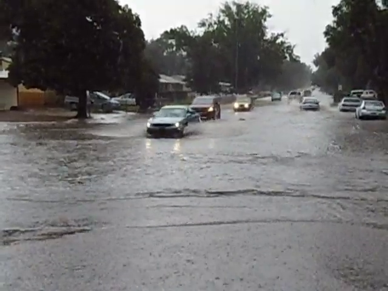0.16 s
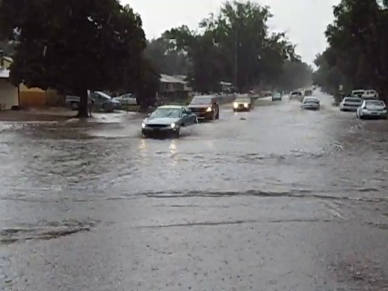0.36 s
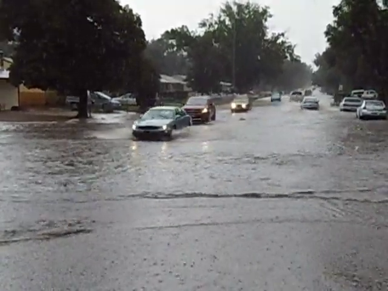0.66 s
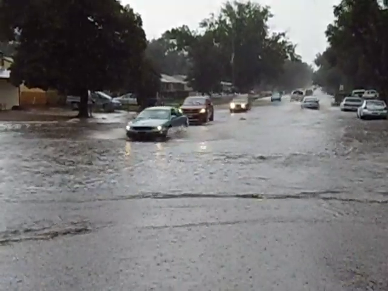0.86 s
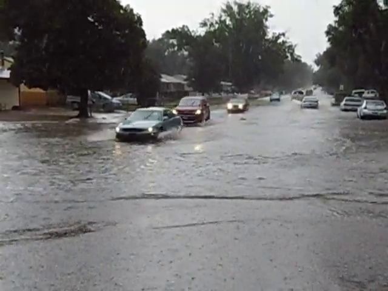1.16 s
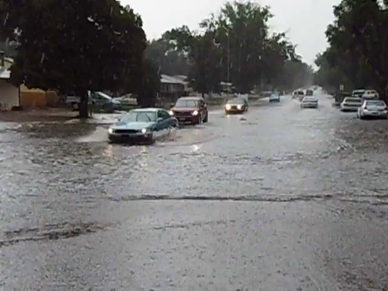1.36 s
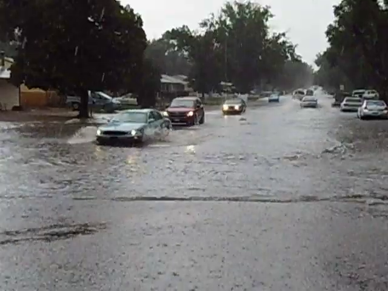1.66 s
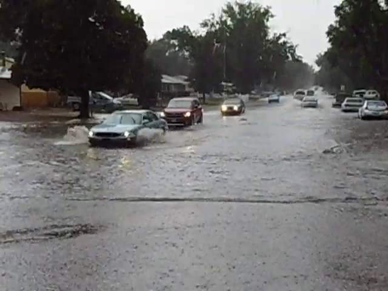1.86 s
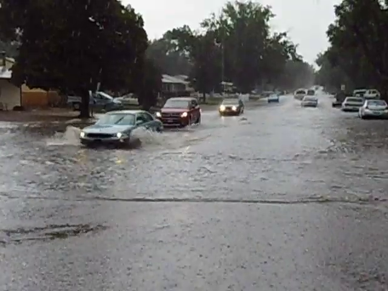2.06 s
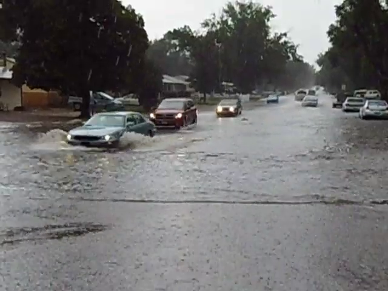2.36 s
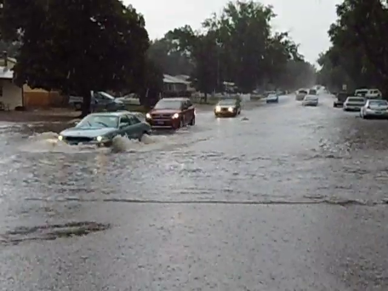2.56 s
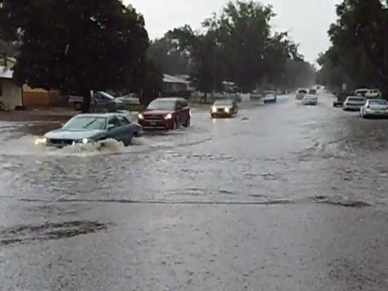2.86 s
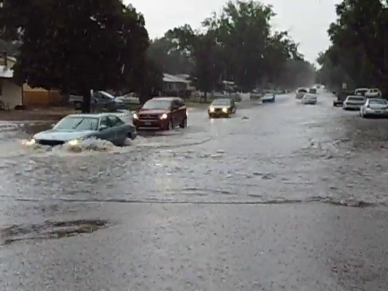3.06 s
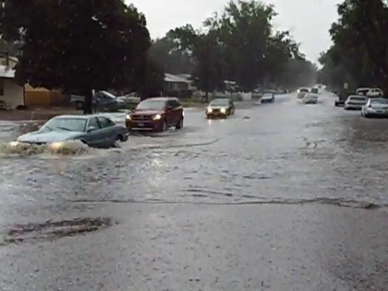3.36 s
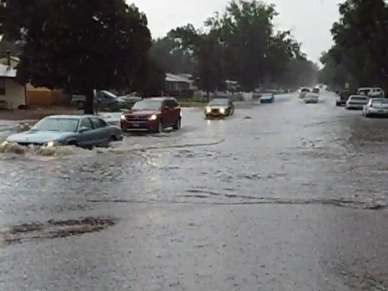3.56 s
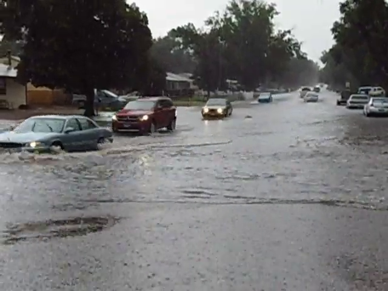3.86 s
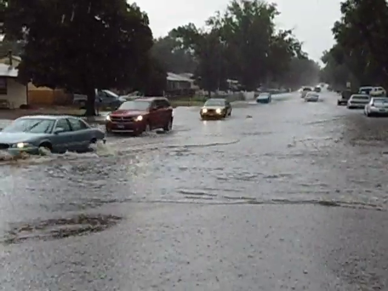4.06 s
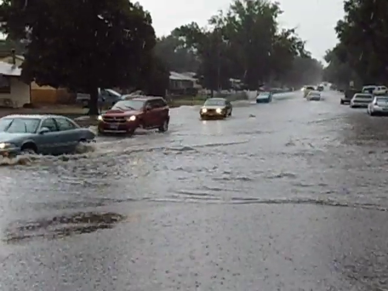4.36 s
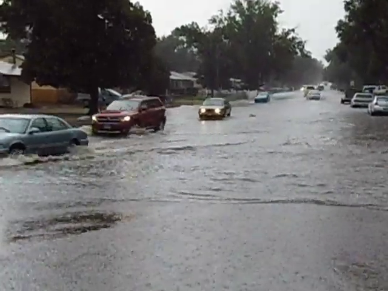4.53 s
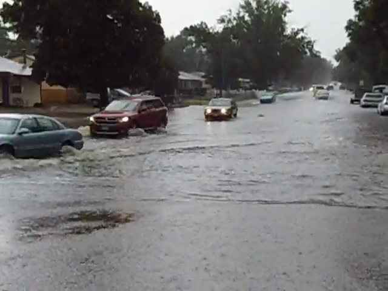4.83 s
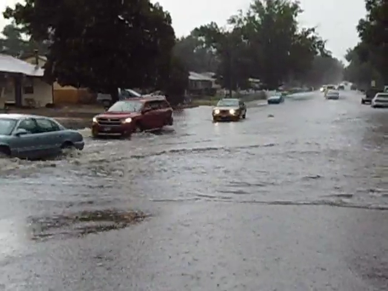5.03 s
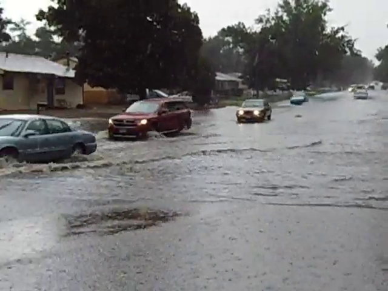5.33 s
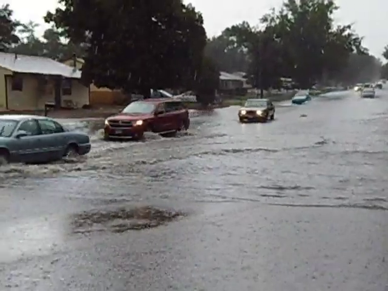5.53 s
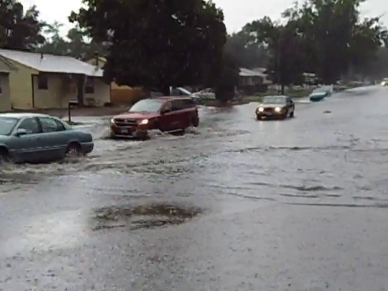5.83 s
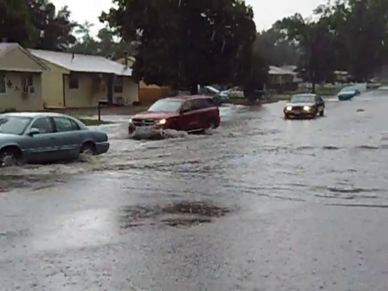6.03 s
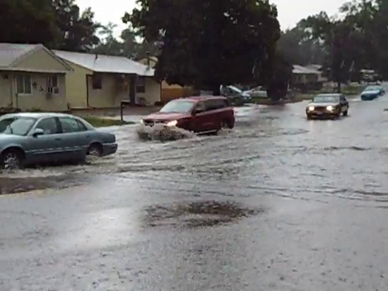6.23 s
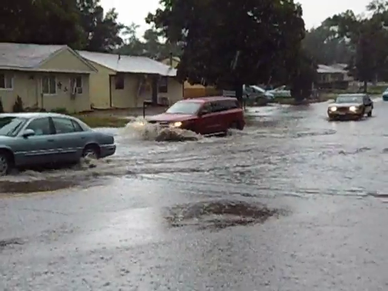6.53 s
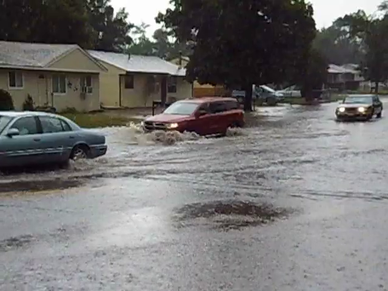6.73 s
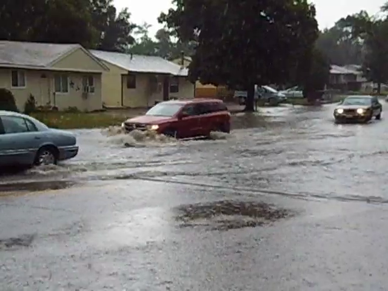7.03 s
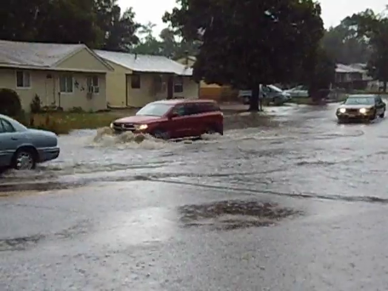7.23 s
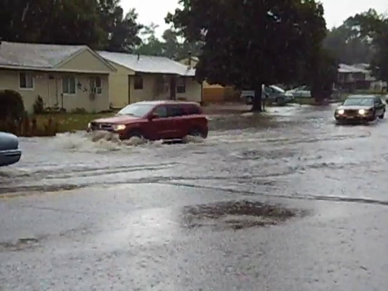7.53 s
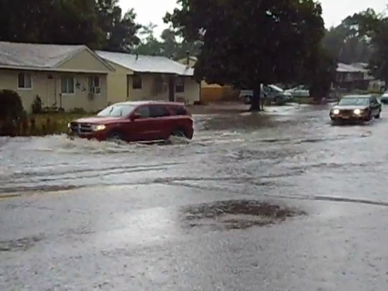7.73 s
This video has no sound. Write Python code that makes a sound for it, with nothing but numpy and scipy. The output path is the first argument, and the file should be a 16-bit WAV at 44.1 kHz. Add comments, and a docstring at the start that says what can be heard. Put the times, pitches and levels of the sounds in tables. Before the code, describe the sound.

Outdoors in a downpour, dense dull rain hiss continues throughout with patter and watery plips. Thunder mutters and gives brief tearing cracks in the first second, quiets, then bursts into a deep, rough boom that distorts the cheap microphone and makes the rain stutter. It recedes in separate smaller claps, swelling again near six seconds and gently near the end. A wading car adds a weak, burbling low hum.

```python
"""Thunder over a flooded street in heavy rain, with a car wading through the water.
Dense trains of shocks grumble far off, break into a loud peal at 2.5 s and roll away in smaller claps.
Rain is hiss, patter and pinging bubbles; the car is a low hum of two unsteady sines.
The peals overload a small narrow-band microphone, which chops the rain hiss in their rhythm."""
import sys
import numpy as np
from scipy import signal
from scipy.fft import rfft, irfft, next_fast_len
from scipy.io import wavfile
from scipy.ndimage import uniform_filter1d, map_coordinates

SR = 44100
rng = np.random.default_rng(int(sys.argv[2]) if len(sys.argv) > 2 else 0)


def dump_mix(stems):
    """Bounce the given channels to the path in sys.argv[1] as a 16-bit WAV at rate SR."""
    frames = np.atleast_2d(stems).T  # one column per channel
    limited = np.clip(frames, -1, 1)  # hard clip at full scale
    pcm = np.round(limited * 32767).astype(np.int16)
    wavfile.write(sys.argv[1], SR, pcm)


N = 347949

ATTACK_S = 0.03  # rise of a peal
FADE_S, FADE_PER_HOLD = 0.047, 0.31  # a peal dies away with this time constant, longer after a long hold
LUMP_DB, LUMPS_PER_S = 3, 14  # the rumble of a peal arrives in lumps
SWELL_DB, SWELLS_PER_S = 1.44, 14  # random rolling of the far thunder
GRUMBLE_CRACKLE_DB = -4.5  # crackle of the far thunder, relative to its boom
FIRING_HZ, REV_HZ_PER_S = 69.6, 2.1  # the car's firing rate climbs as it pushes on
ENGINE_DB = -23.5
EASE_S, EASE_LENGTH_S, EASE_DB = 5.2, 0.32, -8.5  # the driver lifts off for a moment
TOP_HZ = 15800  # nothing above this leaves the microphone chain


def amp(db):
    """Decibels to gain."""
    return 10 ** (np.asarray(db) / 20)


def unit(x):
    """x at rms 1."""
    return x / np.sqrt(np.mean(x ** 2) + 1e-20)


def even(x, seconds):
    """x at rms 1 over every stretch of that length."""
    power = uniform_filter1d(x ** 2, max(int(seconds * SR), 2))
    return x / np.sqrt(np.abs(power) + 1e-12)


def colour(points):
    """The response through (frequency [Hz], level [dB]) points on a log axis."""
    f, db = np.transpose(points)
    return lambda hz: amp(np.interp(np.log(hz + 1), np.log(f + 1), db))


def filtered(x, response):
    """x times a complex response of frequency."""
    m = next_fast_len(N + SR // 2)
    return irfft(rfft(x, m) * response(np.fft.rfftfreq(m, 1 / SR)), m)[:N]


def curves(rows):
    """One value per sample for each column after the time."""
    s, *cols = np.transpose(rows)
    return [np.interp(np.arange(N) / SR, s, c) for c in cols]


def wobble(rate):
    """A smooth random curve, rate knots a second."""
    knots = rng.standard_normal(4096)
    return map_coordinates(knots, [np.arange(N) * rate / SR], mode="wrap")


def impacts(rate, spread_db):
    """Randomly timed pulses, rate a second, of either sign and scattered size."""
    struck = rng.random(N) < rate / SR
    sign = np.sign(rng.standard_normal(N))
    return struck * sign * amp(spread_db * rng.standard_normal(N))


def thunder():
    """Shocks from all along the lightning channel arrive in a dense train, dulled by distance."""
    # spectra of deep rumble and crackle: (frequency [Hz], level [dB per Hz])
    rumble_tone = [(12, -18), (30, -8), (50, -6.5), (80, -4.5), (116, 1), (130, -1), (147, 0), (175, -10.5),
                   (400, -49)]
    crackle_tone = [(200, -11), (340, -2), (500, -0.5), (720, -5), (950, -9), (1400, -16), (2200, -24),
                    (5000, -40)]
    deep_gain, boom_gain, crackle_gain = thunder_gains()
    deep = even(filtered(impacts(900, spread_db=3.5), colour(rumble_tone)), seconds=0.12)
    boom = even(filtered(impacts(900, spread_db=1.5), boom_response), seconds=0.049)
    crackle = even(filtered(impacts(700, spread_db=1.5), colour(crackle_tone)), seconds=0.13)
    return deep_gain * deep + boom_gain * boom + crackle_gain * crackle


def boom_response(f):
    """Neighbouring resonances of alternating sign, rolled off above 460 Hz."""
    # resonances of the boom: (centre [Hz], width [Hz], level [dB])
    resonances = [(205.3, 26.2, 0), (238.1, 28, -2), (289.1, 35.3, -5)]
    ring = 0
    for k, (centre, width, db) in enumerate(resonances):
        band = 1j * f * width / (centre * centre - f * f + 1j * f * width)
        ring = ring + (-1) ** k * amp(db) * band
    return ring / (1 + (f / 460) ** 6)


def thunder_gains():
    """Gains of rumble, boom and crackle: the peals add in power to the far grumble."""
    # peals: (start [s], hold [s], boom level [dB], deep rumble re boom [dB], crackle re boom [dB])
    peals = [(0.89, 0.026, -10.5, -18, -7.5), (1.165, .15, -15.5, -12.5, -11), (2.47, .13, -10.5, 5, -1.5),
             (2.698, .14, -9, 4, -1), (2.969, .1, -9, 2, 0.5), (3.153, .18, -.5, -4.5, -7.5),
             (3.627, 0.099, -10, -7, -10.5), (3.802, 0.037, -17.5, 5, -6.5), (4.208, 0.033, -4, -2, -12.5),
             (4.442, .03, -19, 4.5, -0.5), (4.537, 0.039, -13, -8, -7), (5.103, 0.021, -11.5, -13.5, -13),
             (5.323, 0.23, -18, -12, -13.5), (5.561, .04, -16.5, 3.5, -13), (5.799, 0.018, -12.5, -8, -11),
             (6.037, .17, -4.5, -7, -9), (7.257, 0.076, -11.5, -9, -22.5), (7.608, 0.035, -12, -10, -18.5),
             (7.749, .15, -9, -9.5, -12.5)]
    # far thunder that never stops: (time [s], boom level [dB], deep rumble level [dB])
    grumble = [(0, -20, -24.5), (1.35, -20.5, -22), (1.6, -27, -27.5), (2.4, -25.5, -22.5),
               (3.4, -10, -16.5), (4.4, -18.5, -18), (5.2, -23, -21.5), (5.95, -23.5, -23.5),
               (6.4, -16.5, -16), (7.0, -14.5, -20), (7.2, -21.5, -22.5), (7.89, -16.5, -17.5)]
    power = 0
    for start, hold, db, deep_db, crackle_db in peals:
        mix = amp([[deep_db], [0], [crackle_db]])
        power = power + (amp(db) * mix * peal(start, hold)) ** 2
    deep, boom, crackle = np.sqrt(power)
    lumps = amp(LUMP_DB * wobble(LUMPS_PER_S))

    far_boom_db, far_deep_db = curves(grumble)
    far_deep = amp(far_deep_db + SWELL_DB * wobble(SWELLS_PER_S))
    far_boom = amp(far_boom_db + SWELL_DB * wobble(SWELLS_PER_S))
    far_crackle = amp(far_boom_db + GRUMBLE_CRACKLE_DB)
    return np.hypot(lumps * deep, far_deep), np.hypot(boom, far_boom), np.hypot(crackle, far_crackle)


def peal(start, hold):
    """Envelope of one peal: a quick rise, a hold and a fade."""
    age = np.arange(N) / SR - start
    fade_s = abs(FADE_S + FADE_PER_HOLD * hold)
    rise = np.clip(age / ATTACK_S, 0, 1)
    return rise * np.exp(-np.maximum(age - ATTACK_S - hold, 0) / fade_s)


def roll():
    """The main peal rolls with a rough, wandering pitch that climbs at its climax."""
    # path of the roll: (time [s], middle pitch [Hz], middle level [dB])
    path = [(2.465, 100.8, -56.5), (2.49, 115.9, -8.5), (2.88, 130, -10), (3.13, 141.5, -10.5),
            (3.25, 236.7, -1), (3.36, 226.3, 0.5), (3.48, 211, -14), (3.65, 210.1, -62.5)]
    pitch_hz, level_db = curves(path)
    rough_hz = pitch_hz * np.exp(.2 * wobble(90))
    phase = 2 * np.pi * np.cumsum(rough_hz) / SR
    return amp(level_db + 3.9 * wobble(45)) * unit(np.sin(phase))


def rips():
    """Branches of the channel lying across the line of sight deliver their shocks in tight bunches."""
    # brighter tearing bursts in the thunder: (time [s], half length [s], level [dB])
    bursts = [(0.245, 0.053, -16.5), (0.6, 0.082, -18), (1.007, 0.062, -17), (1.184, 0.017, -12.5),
              (3.041, 0.019, -14), (3.292, 0.067, -11.5)]
    # their spectrum: (frequency [Hz], level [dB per Hz])
    tear_tone = [(200, -20), (450, -1), (650, -1.5), (1100, -3), (1600, -12.5), (2600, -21.5),
                 (5000, -42.5)]
    t = np.arange(N) / SR
    bunches = sum(amp(db) * np.exp(-.5 * ((t - s) / length) ** 2) for s, length, db in bursts)
    return bunches * unit(filtered(impacts(690, spread_db=2.5), colour(tear_tone)))


def rain():
    """Countless far drops merge into hiss; nearer ones patter and ping on the water."""
    # the rain eases at first, holds steady, then slowly grows toward the end: (time [s], level [dB])
    rain_level = [(0, -19), (.4, -21.5), (4.2, -21.5), (5, -20.5), (7.89, -19.5)]
    # spectrum of hiss and patter: (frequency [Hz], level [dB per Hz])
    hiss_tone = [(60, -12), (250, 5), (380, -4), (520, 1), (740, 5.5), (930, 0), (1400, 1), (2000, -1.5),
                 (2600, -3), (3600, -6.5), (4900, -8.5), (6500, -14.5)]
    level_db, = curves(rain_level)
    # faint random patches of level over frequency and time
    z = signal.stft(rng.standard_normal(N), nperseg=512)[2]
    patches = uniform_filter1d(rng.standard_normal(z.shape), size=7, axis=0)
    patches = uniform_filter1d(patches, size=10, axis=1)
    wash = signal.istft(z * amp(0.72 * unit(patches)), nperseg=512)[1][:N]

    far = unit(filtered(wash, colour(hiss_tone)))
    patter = unit(filtered(impacts(1100, spread_db=2.5), colour(hiss_tone)))
    pings = near_drops(rate=220, pitch_hz=2780, cycles=2.1, spread_db=3.0)
    gust_db = 0.26 * wobble(6.8) + 0.26 * wobble(35)
    return amp(level_db + gust_db) * (amp(3.0) * far + amp(-3.5) * patter + amp(-12.0) * pings)


def near_drops(rate, pitch_hz, cycles, spread_db, count=4000):
    """Close drops trap bubbles that ping for a few cycles, rising as they die."""
    when, chance = rng.random((2, count))
    tone, size = rng.standard_normal((2, count, 1))
    t = np.arange(SR // 100) / SR
    turns = np.clip(pitch_hz * np.exp(.45 * tone), 600, 5500) * t
    decay = np.exp(-turns / cycles)
    pings = amp(spread_db * np.minimum(size, 2.6)) * decay * np.sin(2 * np.pi * turns * (1 + 6 * t))
    pings *= (chance < rate * N / SR / count)[:, None]  # keep about rate drops a second
    at = (when * N).astype(int)[:, None] + np.arange(len(t))
    return unit(np.bincount(at.ravel(), pings.ravel(), N)[:N])


def plinks():
    """A big drop's bubble swells and dies within a few milliseconds."""
    # a fat drop right by the microphone: (time [s], pitch [Hz], peak level [dB])
    fat_drops = [(4.029, 4500, -11.5)]
    t = np.arange(N) / SR
    out = np.zeros(N)
    for s, hz, db in fat_drops:
        age = np.maximum(t - s, 0) / 0.00046  # in rise times
        out += amp(db) * age * np.exp(1 - age) * np.sin(2 * np.pi * hz * t)
    return out


def engine():
    """A car labours through the flood with a low exhaust hum that stumbles and burbles."""
    t = np.arange(N) / SR
    firing_hz = FIRING_HZ + REV_HZ_PER_S * t
    level_db = ENGINE_DB + EASE_DB * np.exp(-.5 * ((t - EASE_S) / EASE_LENGTH_S) ** 2)
    stumbling_hz = firing_hz * (1 + .09 * wobble(30))
    phase = 2 * np.pi * np.cumsum(stumbling_hz) / SR
    burble = amp(4 * wobble(18))
    return amp(level_db) * unit(burble * (np.sin(phase) + 0.42 * np.sin(2 * phase)))


def scene():
    """Storm and street at one microphone."""
    return (thunder() + roll() + rips() + rain() + plinks() + engine())[None]


def overload(x, top, hardness):
    """Saturation that flattens everything beyond top."""
    return x / (1 + np.abs(x / top) ** hardness) ** (1 / hardness)


def record(dry):
    """The input saturates, a voice-band filter follows, and its overshoots clip again faintly."""
    flat = overload(dry[0], top=.73, hardness=14)
    voice_band = colour([(4900, 0), (5300, -4.5), (5700, -12.5), (6050, -22.5), (6400, -70)])
    narrow = filtered(flat, voice_band)
    coupled = filtered(narrow, lambda hz: 1j * hz / (1j * hz + 2.8))  # the coupling capacitor makes flat tops sag
    out = np.clip(coupled, -.715, .715)
    return filtered(out, lambda hz: hz < TOP_HZ)[None]


dry = scene()
out = record(dry)
dump_mix(out)
```